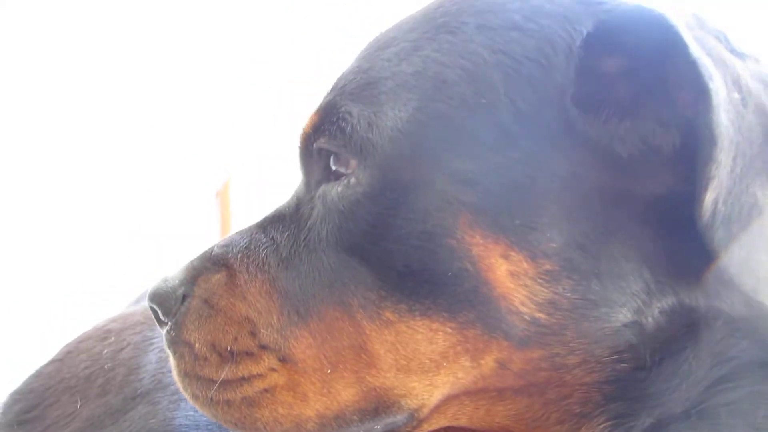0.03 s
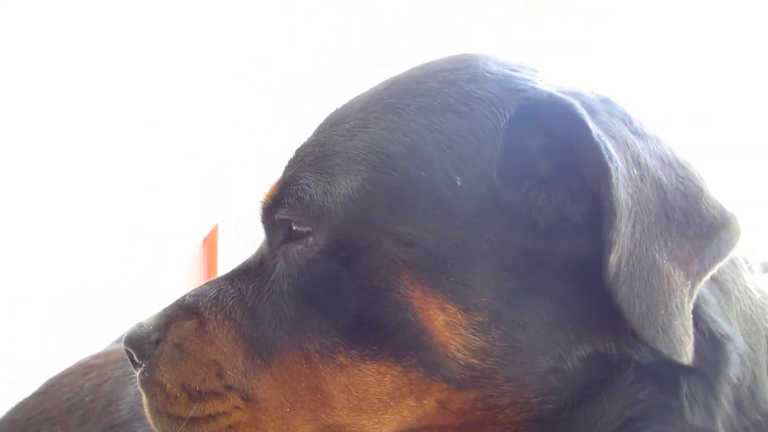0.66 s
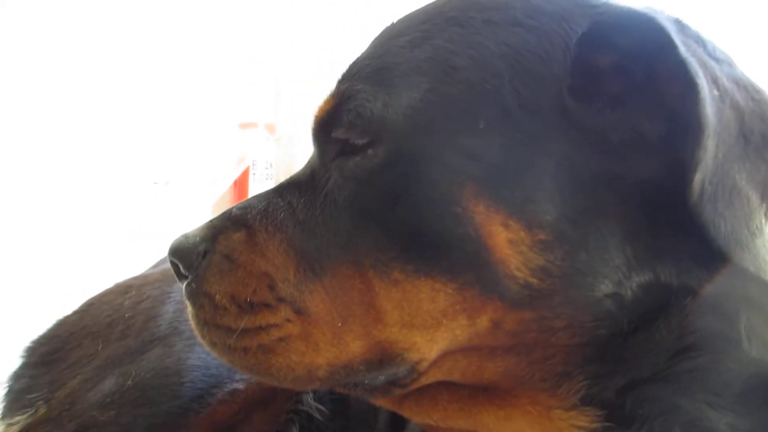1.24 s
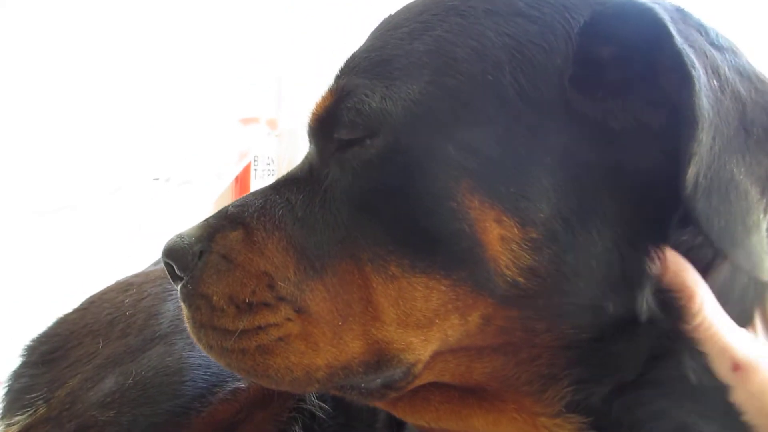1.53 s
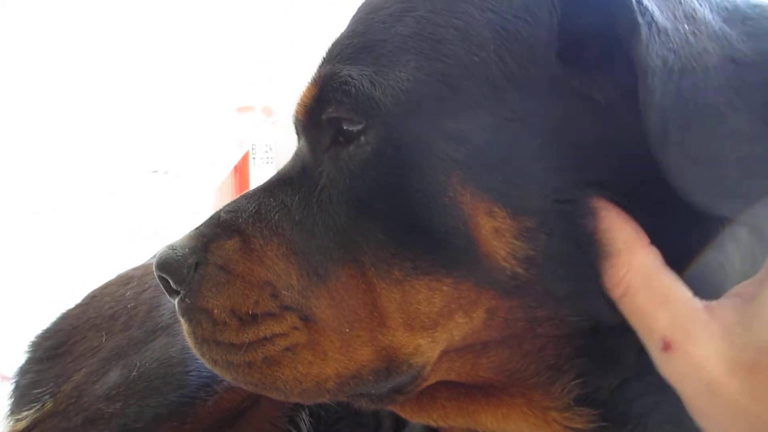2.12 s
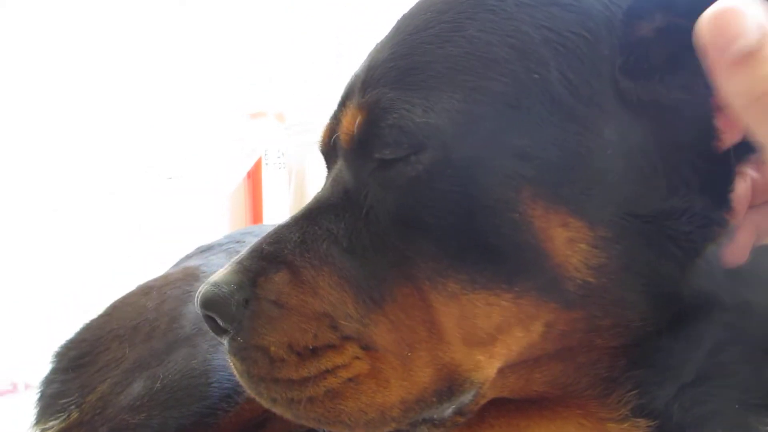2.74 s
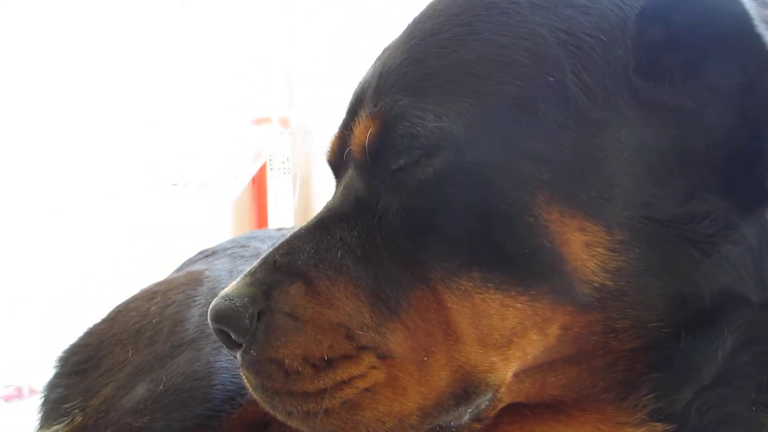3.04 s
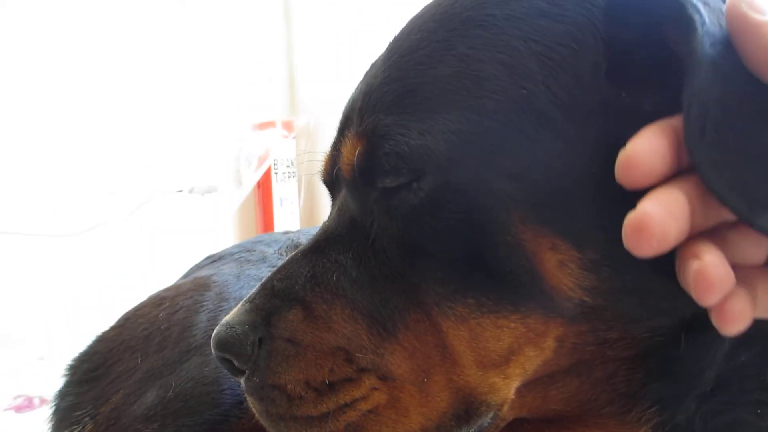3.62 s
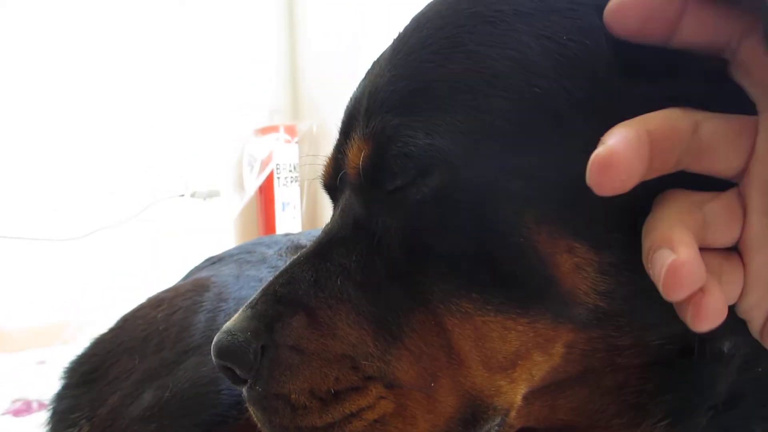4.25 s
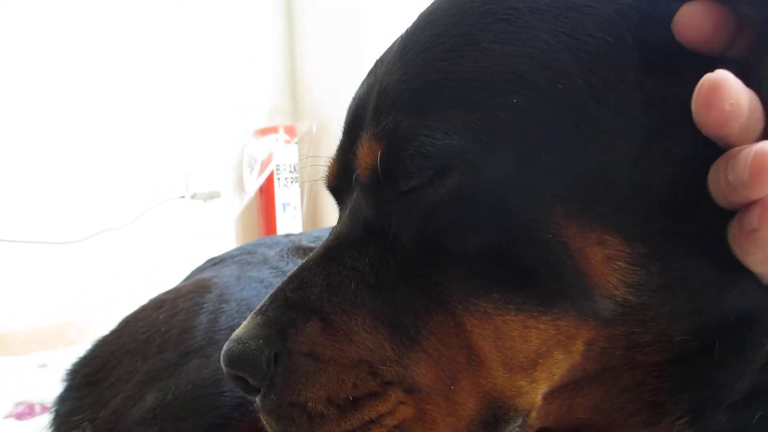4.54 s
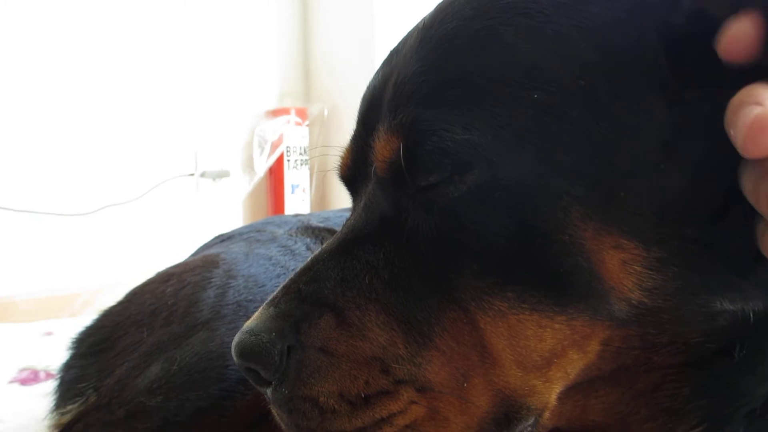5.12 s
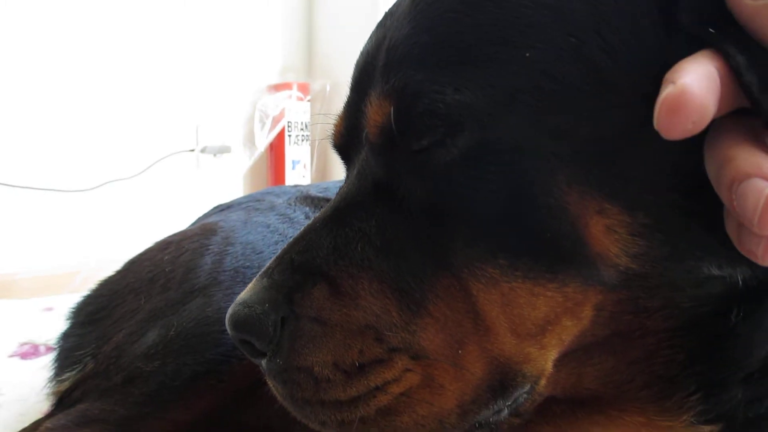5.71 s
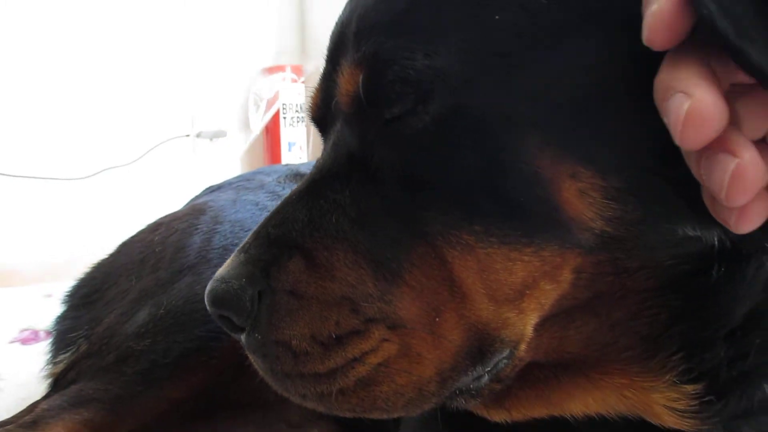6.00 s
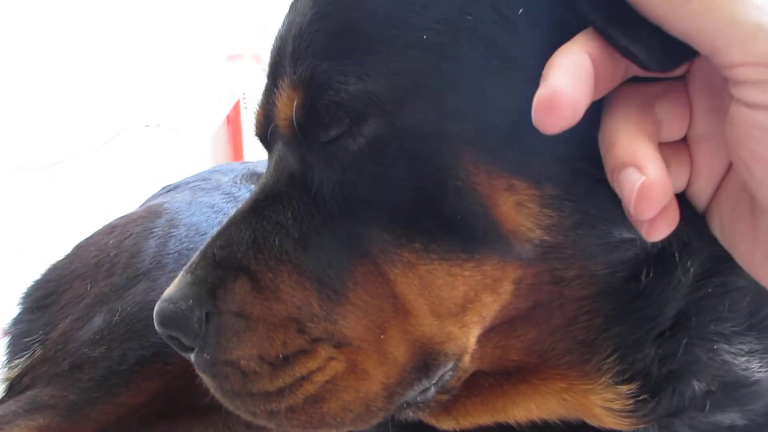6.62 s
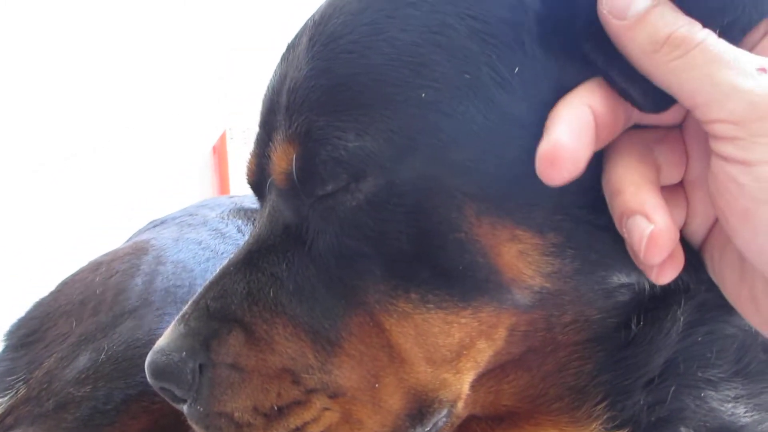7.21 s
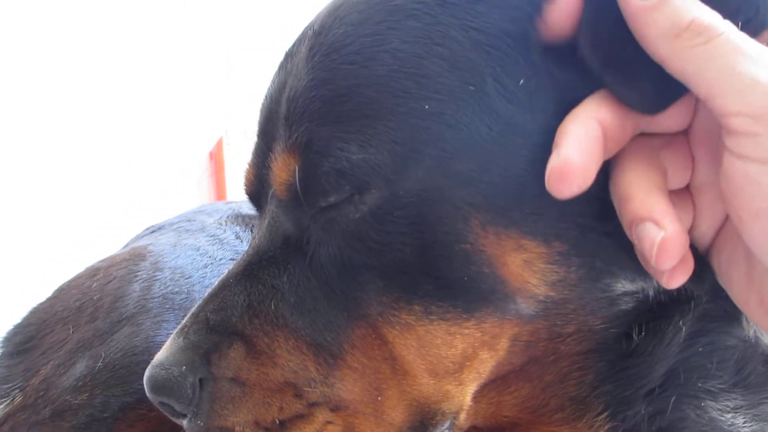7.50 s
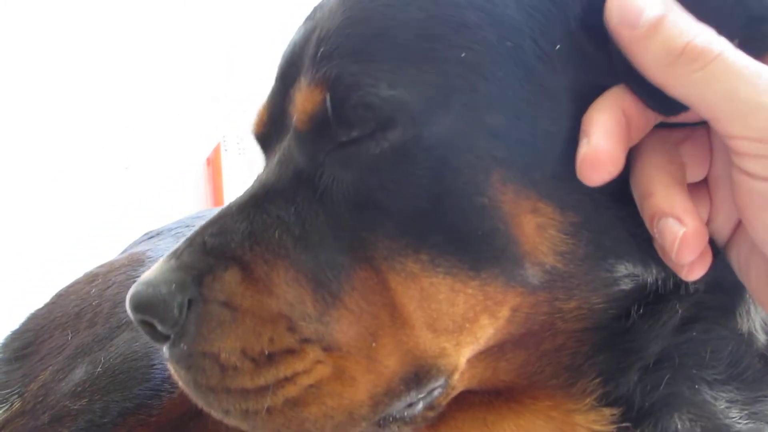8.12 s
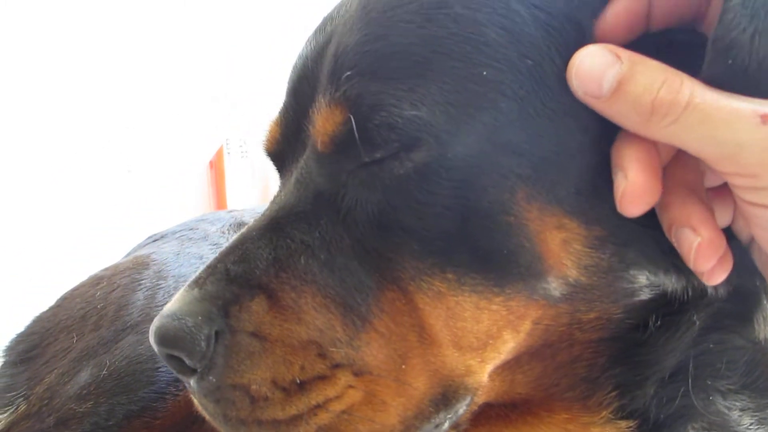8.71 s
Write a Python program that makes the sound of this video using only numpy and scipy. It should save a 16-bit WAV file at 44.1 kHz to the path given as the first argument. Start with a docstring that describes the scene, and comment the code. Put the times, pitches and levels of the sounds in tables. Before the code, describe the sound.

A close camera focus motor ticks and whirrs over faint fur rubbing in a quiet room, with one sharp static snap.

```python
"""A hand-held camera whirrs close by: its focus motor steps and ticks eight times a second, in bouts,
and its iris (the light opening) and lens knock against their stops, making the housing ring.
Behind it a hand softly rubs a dog's ear in a quiet, faintly humming room. A static spark snaps
into the microphone once; the gain control turns the sound down and slowly recovers."""
import sys
import numpy as np
from scipy import signal
from scipy.fft import rfft, irfft, next_fast_len
from scipy.io import wavfile
from scipy.ndimage import uniform_filter1d, minimum_filter1d, map_coordinates

SR = 44100
rng = np.random.default_rng(int(sys.argv[2]) if len(sys.argv) > 2 else 0)


def put_to_file(sound):
    """Save the sound as 16-bit audio at rate SR, in the file named by the first command-line argument."""
    columns = np.atleast_2d(sound).T  # one column per channel
    safe = np.clip(columns, -1, 1)
    whole_steps = np.round(safe * 32767)
    wavfile.write(sys.argv[1], SR, whole_steps.astype(np.int16))


N = 385875


def amp(db):
    """Turn decibels into a gain."""
    return 10 ** (np.asarray(db) / 20)


def unit(x):
    """Scale a sound to an average (rms) size of 1."""
    return x / np.sqrt(np.mean(x ** 2) + 1e-20)


def curve(rows):
    """Join (time_s, value) points with straight lines, one value per sample."""
    return np.interp(np.arange(N) / SR, *np.transpose(rows))


def wobble(rate):
    """A smooth curve through `rate` random points a second."""
    return map_coordinates(rng.standard_normal(int(N * rate / SR) + 4), [np.arange(N) * rate / SR])


def spells(rows, rest_db, fade_s):
    """A resting gain plus (start_s, end_s, level_db) spells that fade in and out."""
    t = np.arange(N) / SR
    return amp(rest_db) + sum(amp(db) * np.clip(np.minimum(t - start, end - t) / fade_s + .5, 0, 1)
                              for start, end, db in rows)


def filtered(x, response):
    """Scale each frequency in x by response(hz)."""
    size = next_fast_len(N + SR // 4)
    return irfft(rfft(x, size) * response(np.fft.rfftfreq(size, 1 / SR)), size)[..., :N]


def coloured(x, spectrum):
    """Shape x by (pitch_hz, relative_db) points, then scale it to size 1."""
    pitches, db = np.transpose(spectrum)
    return unit(filtered(x, lambda hz: amp(np.interp(np.log(hz + 1), np.log(pitches), db))))


def tone(hz, drift_hz, lead):
    """A slightly unsteady stereo tone; the left side is ahead by `lead` radians."""
    phase = 2 * np.pi * np.cumsum(hz + drift_hz * wobble(28)) / SR
    return np.sqrt(2) * np.sin([phase + lead / 2, phase - lead / 2])


def add(track, start_s, sound):
    """Mix a sound into the track."""
    part = track[:, round(start_s * SR):][:, :sound.shape[1]]
    part += sound[:, :part.shape[1]]


def ring(modes, scatter_db, detune):
    """A struck part's notes (modes), each falling 60 dB in its fade_s: modes x channels x samples."""
    t = np.arange(SR // 25) / SR
    hz, db, fade_s, lead = np.transpose(modes)[:, :, None, None]
    size_luck, pitch_luck = rng.standard_normal((2, len(modes), 1, 1))
    phase = 2 * np.pi * hz * (1 + detune * pitch_luck) * t + lead * np.array([[.5], [-.5]])
    sign = (-1) ** np.arange(len(modes))[:, None, None]
    attack = 1 - np.exp(-t / .00023)
    return sign * amp(db + scatter_db * size_luck - 60 * t / fade_s) * np.sin(phase) * attack


def crack(samples, fade_s):
    """The brief noise of two hard parts meeting."""
    return unit(rng.standard_normal((2, samples)) * amp(-60 * np.arange(samples) / SR / fade_s))


def room():
    """A rough low hum swells and fades; a higher one comes in later."""
    # noise around the low hum: pitch_hz, relative_db
    rumble = [(50, -11), (75, -0.5), (110, -6.5), (145, -8.5), (205, -5), (280, -26), (600, -69)]
    # swells of the low hum: start_s, end_s, relative_db
    swells = [(2.55, 3.42, -54), (3.6, 4.4, -52), (4.64, 4.95, -52.5), (6.05, 7.0, -62.5)]
    # strength of the higher hum: time_s, relative_db
    higher_levels = [(0, -81), (5.7, -70), (6.3, -63.5), (8.75, -64.5)]
    low = tone(71, drift_hz=2.43, lead=.45) + amp(-5.5) * coloured(rng.standard_normal(N), rumble)
    low *= amp(-1.5) * spells(swells, rest_db=-60, fade_s=.3)
    higher = amp(curve(higher_levels)) * tone(575, drift_hz=5.87, lead=.33)
    return (low + higher) * amp([[-1.5], [1.5]])


def fur():
    """Hairs slip under the fingers in dense, uneven little grains."""
    # strength of the rubbing: time_s, relative_db
    rubbing = [(0.0, -56.5), (2.63, -53.5), (3.5, -54.5), (4.1, -54), (4.8, -55), (5.2, -52), (6.41, -53),
               (7.1, -59.5)]
    # colour of the rustle: pitch_hz, relative_db
    colour = [(250, -5), (600, -7), (950, 12.5), (1700, -7.5), (2600, -13.5), (4000, -17.5), (6500, -25.5),
              (9000, -23.5), (16000, -31)]
    slips = rng.standard_normal((3, N)) * amp(3 * wobble(220) + .7 * wobble(14))
    rustle = coloured(slips[:2] + 1.15 * slips[2], colour)  # the third row reaches both sides
    return amp(curve(rubbing) - 1.5) * rustle * amp([[-1.1], [1.1]])


def spark():
    """Static makes one steep pulse, opposite in left and right; the input's bass cut swings it back."""
    t = np.arange(SR // 20) / SR
    push = 6.4 * np.exp(-t / .00052)
    swing = .78 * np.exp(-t / .003)
    pulse = (push - swing) * np.minimum(t / .00044, 1)
    out = np.zeros((2, N))
    add(out, 7.17651, np.array([[.9], [0]]) * pulse)
    add(out, 7.17646, np.array([[0], [-1.2]]) * pulse)
    return out


def camera_works():
    """The camera's running parts whirr, its iris drive buzzes and its electronics whine thinly."""
    # whirr alike on both sides: pitch_hz, relative_db
    alike_colour = [(22, -28), (47, 8), (70, -5.5), (100, -2.5), (130, -8), (200, -7), (330, -14),
                    (680, -10.5), (900, -8.5), (1150, -7.5), (1350, -11.5), (1750, -10), (2200, -23),
                    (4600, -41.5), (6800, -34.5), (7700, -41.5), (16000, -38.5)]
    # whirr opposite in left and right: pitch_hz, relative_db
    opposite_colour = [(22, -19), (47, -2), (120, -2), (220, -5), (400, -4), (700, -8), (950, -5.5),
                       (1400, -15), (1800, -16.5), (2600, -28), (4800, -42), (9000, -45), (16000, -40)]
    # tones of the running parts: pitch_hz, relative_db
    steady_tones = [(612, -67), (1002, -66), (1182, -65.5), (1503, -67), (1802, -65.5), (3392, -82.5),
                    (8527, -96), (11418, -97), (15734, -106)]
    # tones of the iris drive: pitch_hz, relative_db
    buzz_tones = [(1002, 21), (1503, 12.5), (7018, -4), (8527, -5.5), (9525, -8)]
    # moves of the iris drive: start_s, end_s, relative_db
    iris_moves = [(1.9, 2.1, -84), (2.42, 2.53, -77.5), (4.95, 5.04, -74), (6.24, 6.45, -73)]
    # bursts of whine: start_s, end_s, level_db
    bursts = [(4.08, 4.17, -69), (4.22, 4.29, -68), (4.34, 5.21, -66.5), (5.27, 5.34, -71),
              (5.5, 5.59, -71), (5.75, 5.83, -75)]
    alike = amp(-50) * coloured(rng.standard_normal(N), alike_colour)
    opposite = amp(-47.5) * coloured(rng.standard_normal(N), opposite_colour)
    whirr = np.array([alike + opposite, alike - opposite])
    steady = sum(amp(db) * tone(hz, drift_hz=5, lead=.7) * amp(2.5 * wobble(7))
                 for hz, db in steady_tones)
    awake = np.arange(N) / SR > 1.05  # no buzz or whine before this second
    drive = awake * spells(iris_moves, rest_db=-87, fade_s=.05)
    buzz = drive * sum(amp(db) * tone(hz, drift_hz=12, lead=-.8) for hz, db in buzz_tones)
    whine = awake * spells(bursts, rest_db=-84, fade_s=.025) * tone(12409, drift_hz=1.5, lead=-2.14)
    return (whirr + steady + buzz) * amp([[-1.3], [1.3]]) + whine


def tick(relative_db):
    """The lens barrel snaps and rings."""
    # notes of the barrel: pitch_hz, relative_db, fade_s, left_lead_radians
    barrel = [(2117, 8.5, 0.013, 1.37), (2810, 2, 0.011, 0.55), (3197, 1.5, 0.016, 2.04),
              (4480, 0, 0.0077, 0.23), (4970, 2.5, 0.012, 1.7), (6460, 9, 0.0031, 0.98),
              (7930, -1.5, 0.011, 1.9), (9640, -0.5, 0.0056, 1.47), (10880, 2, 0.0065, 1.7)]
    ringing = unit(ring(barrel, scatter_db=1.5, detune=.012).sum(0))
    snap = amp(-9) * crack(ringing.shape[1], fade_s=.005)
    return amp(relative_db + 3.5) * (ringing + snap)


def focus():
    """The lens steps on a steady beat, ticking as it starts and stops; its motor hums and rasps."""
    # lone hard ticks, mostly as the lens engages after a rest: start_s, relative_db
    lone_ticks = [(0.9954, -59.5), (3.0812, -56), (5.1252, -61.5), (7.5477, -63), (8.4265, -57)]
    # bouts of hunting for focus: start_s, step_count, first_place_in_cycle, relative_db
    hunts = [(1.0774, 13, 0, 0), (3.1627, 5, 1, 0), (3.7875, 2, 3, -1), (4.0388, 3, 3, -4),
             (5.2062, 2, 1, 1), (5.458, 8, 2, .5), (6.4585, 4, 0, 0), (7.6256, 7, 2, -.5),
             (8.5005, 2, 0, 1)]
    # the four steps of one to-and-fro cycle: start_tick_db, stop_tick_db (both relative)
    cycle = [(-59.5, -67), (-64, -63), (-59.5, -68), (-67.5, -63.5)]
    # colour of the motor's rasp: pitch_hz, relative_db
    rasp_colour = [(250, -47), (410, 0), (480, -2), (540, 3), (600, -0.5), (760, -38), (3800, -50),
                   (4800, -24.5), (5600, -63)]
    step_s = .12505
    travel_s, motor_on_s, motor_off_s = .0494, .0076, .067  # counted from a step's start
    ticks, running = np.zeros((2, N)), np.zeros(N)
    for start_s, db in lone_ticks:
        add(ticks, start_s, tick(db))
    for first_s, steps, place, db in hunts:
        for step in range(round(steps)):
            start_s = first_s + step * step_s
            start_db, stop_db = cycle[(round(place) + step) % len(cycle)]
            add(ticks, start_s, tick(db + start_db))
            add(ticks, start_s + travel_s, tick(db + stop_db))
            running[round((start_s + motor_on_s) * SR):round((start_s + motor_off_s) * SR)] = 1
    hum = amp(-52.5) * tone(478, drift_hz=6.13, lead=2.04)
    rasp = amp(-49) * coloured(rng.standard_normal(N), rasp_colour) * np.array([[.6], [-1.1]])
    motor_gain = uniform_filter1d(running, size=700) * amp(.8 * wobble(8))
    return ticks + (hum + rasp) * motor_gain


def knocks():
    """Iris blades and lens hit their stops and rebound once, ringing the housing."""
    # notes of the housing: pitch_hz, relative_db, fade_s, left_lead_radians
    housing = [(447, -2.5, 0.029, 4), (616, -2, 0.013, 5), (890, -0.5, 0.017, -1), (1130, -3, 0.031, -1.1),
               (1446, 6.5, 0.0092, -1), (1800, 1.5, 0.0093, 0.06), (2207, -10.5, 0.042, 1),
               (2565, 9.5, 0.014, 1.5), (3150, -4, 0.028, 2), (3615, -5, 0.022, 1.5),
               (6100, 0, 0.0086, -12), (7050, 5.5, 0.0082, 18.5), (8600, 0.5, 0.013, -4.5)]
    # knocks of the iris: start_s, relative_db, ring_hz
    iris_knocks = [(1.1007, -47.5, 1140), (1.5338, -45, 890), (2.013, -40.5, 890), (2.7727, -40.5, 900),
                   (2.8526, -40, 880), (3.0978, -42, 890), (3.3733, -41.5, 890), (4.062, -49, 930),
                   (4.4141, -46, 1130), (5.0962, -40.5, 1140), (5.1336, -41, 1130), (5.7748, -46, 1130),
                   (6.3752, -39.5, 1066), (6.9338, -50.5, 1130), (7.233, -41, 1050), (7.5149, -41.5, 890),
                   (7.9533, -44.5, 900)]
    # higher knocks thud more: ring_hz, thud_over_body_db
    thud_levels = [(890, -19.5), (1130, -6)]
    # brighter clacks of the lens, partway through some steps: start_s, relative_db
    lens_clacks = [(1.599, -55), (2.1016, -57), (3.9342, -49.5), (5.4835, -48.5), (5.7297, -49),
                   (5.9806, -49), (6.6059, -50.5), (7.7733, -48.5), (8.0239, -51)]
    out = np.zeros((2, N))
    hz = np.array(housing)[:, 0]
    band = np.digitize(hz, [700, 2400, 5000])  # thud, body, edge, click

    def strike(start_s, db, ring_hz, thud_db, edge_db, click_db):
        """The place of the blow favours notes near ring_hz; higher knocks ring purer."""
        purity_db = np.interp(ring_hz, [890, 1130], [5.5, 11])
        favour = amp(purity_db * np.exp(-((hz - ring_hz) / 130) ** 2))
        notes = ring(housing, scatter_db=1.5, detune=.008) * favour[:, None, None]
        thud, body, edge, click = [unit(notes[band == k].sum(0)) for k in range(4)]
        click = unit(click + 1.04 * crack(click.shape[1], fade_s=.012))
        blow = amp(db + .5) * (amp(thud_db) * thud + body + amp(edge_db) * edge + amp(click_db) * click)
        add(out, start_s, blow)
        add(out, start_s + .0034, amp(-9) * blow)  # the rebound

    for start_s, db, ring_hz in iris_knocks:
        thud_db = np.interp(ring_hz, *np.transpose(thud_levels))
        strike(start_s, db, ring_hz, thud_db, edge_db=-24.5, click_db=-21)
    for start_s, db in lens_clacks:
        strike(start_s, db, ring_hz=1190, thud_db=-8.5, edge_db=-7, click_db=-25.5)
    return out * amp([[-1.3], [1.3]])


def scene():
    """Everything that reaches the left and right microphones."""
    return camera_works() + focus() + knocks() + fur() + room() + spark()


def gain_control(x, threshold_db, hold_s, release_db_per_s):
    """Peaks over the threshold pull the volume down; it waits, then climbs back."""
    over_db = np.maximum(20 * np.log10(np.abs(x).max(0) + 1e-9) - threshold_db, 0)
    samples = max(int(hold_s * SR), 2)
    held_db = -minimum_filter1d(-over_db, samples, origin=(samples - 1) // 2)
    ramp_db = release_db_per_s * np.arange(N) / SR
    cut_db = np.maximum.accumulate(held_db + ramp_db) - ramp_db
    smoothing = 1 / (.0094 * SR)
    return x * amp(-signal.lfilter([smoothing], [1, smoothing - 1], cut_db))


def record(dry):
    """The input clips at full scale, the gain control reacts, and the highest treble is cut off."""
    top_hz = 15950
    ducked = gain_control(np.clip(dry, -1, 1), threshold_db=-10, hold_s=.13, release_db_per_s=16)
    return filtered(ducked, lambda hz: 1 / np.sqrt(1 + (hz / top_hz) ** 200))


dry = scene()
out = record(dry)
put_to_file(out)
```